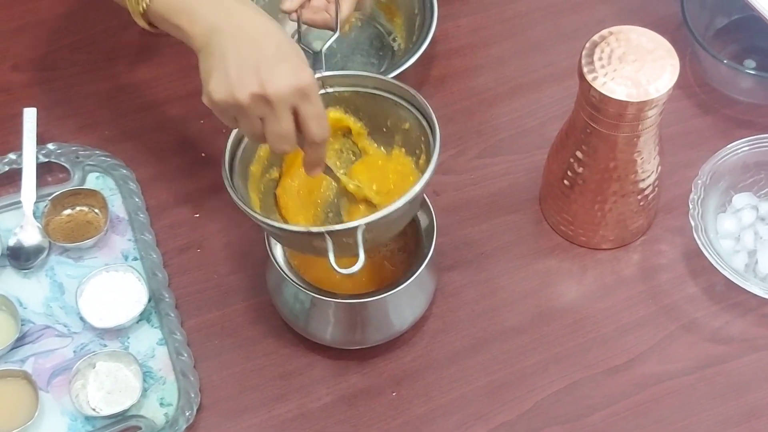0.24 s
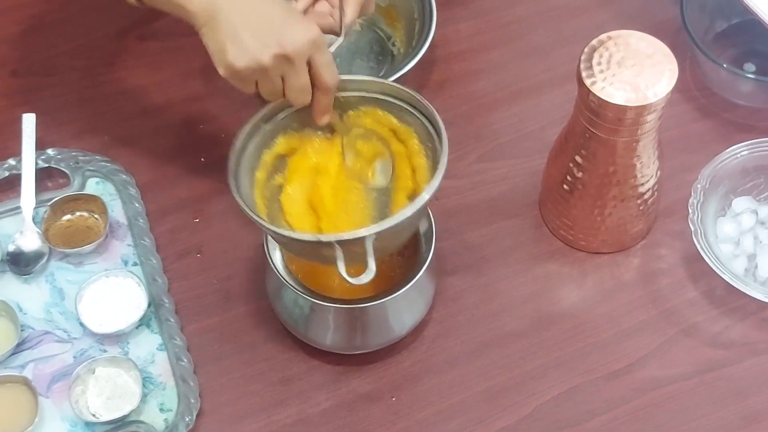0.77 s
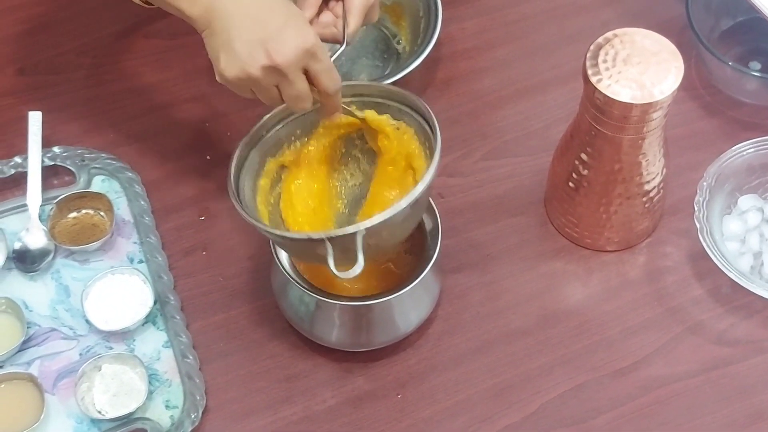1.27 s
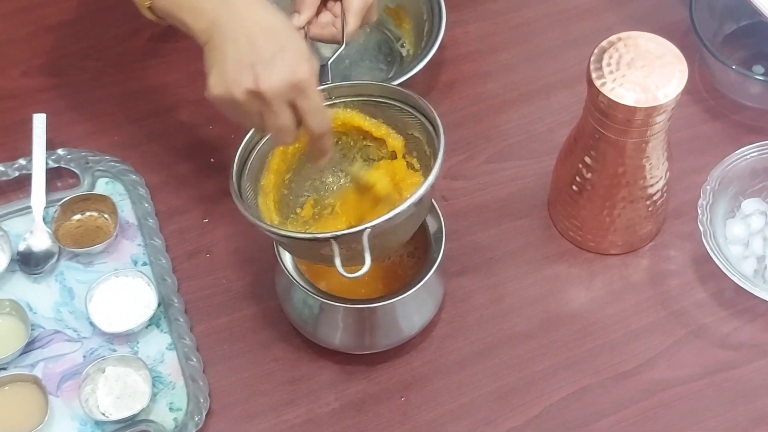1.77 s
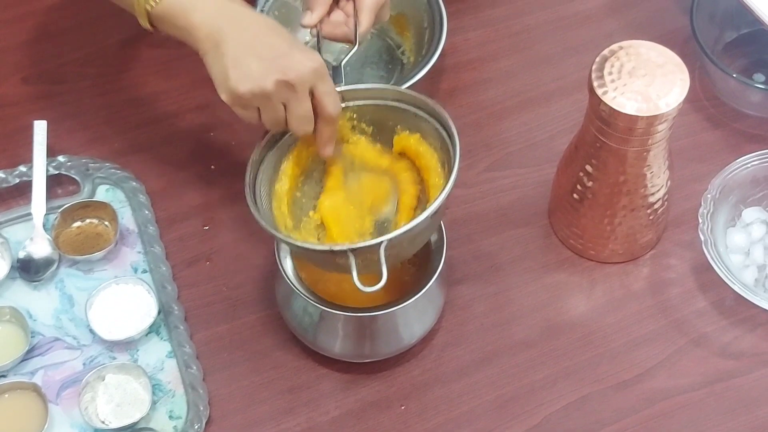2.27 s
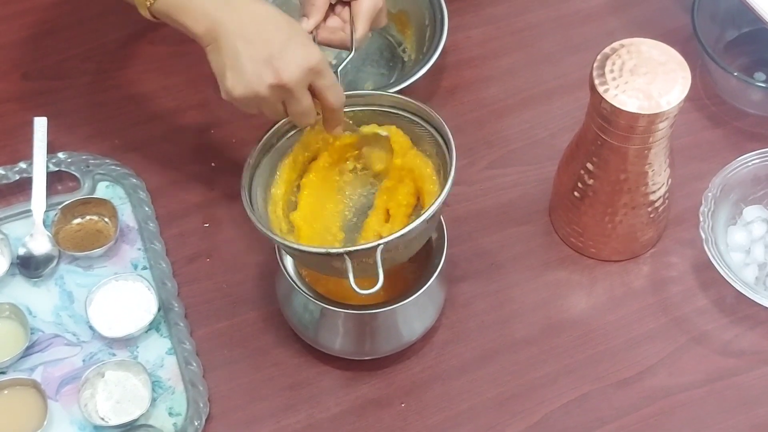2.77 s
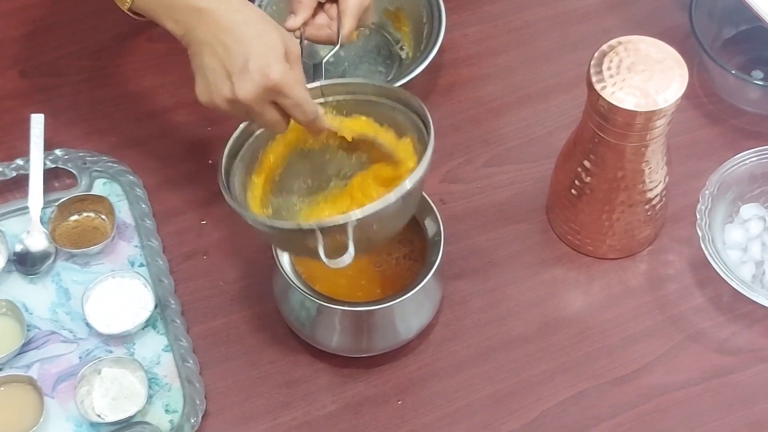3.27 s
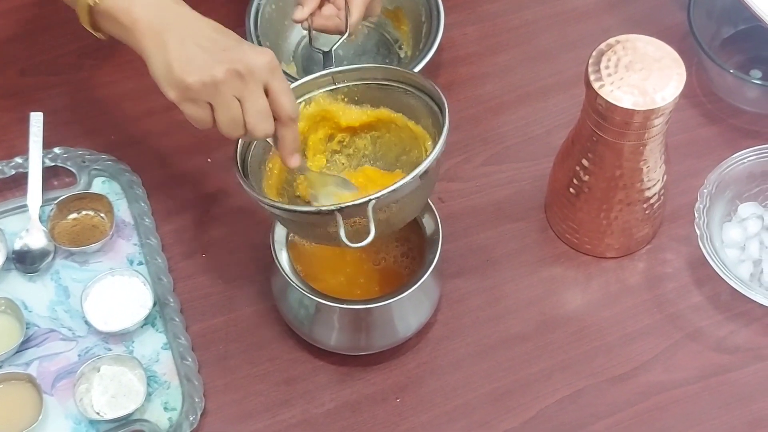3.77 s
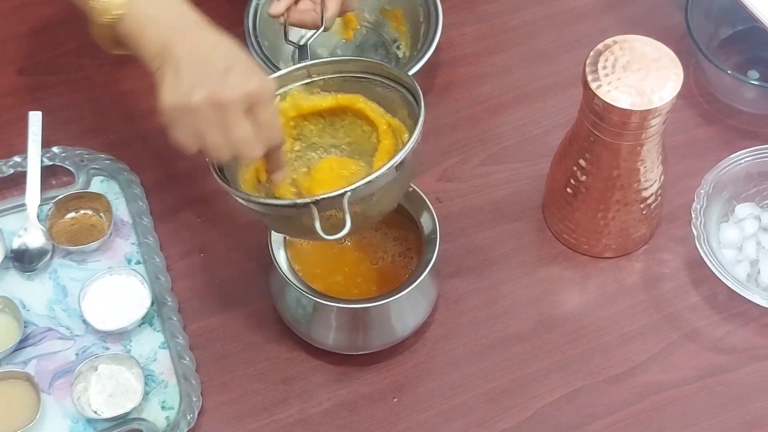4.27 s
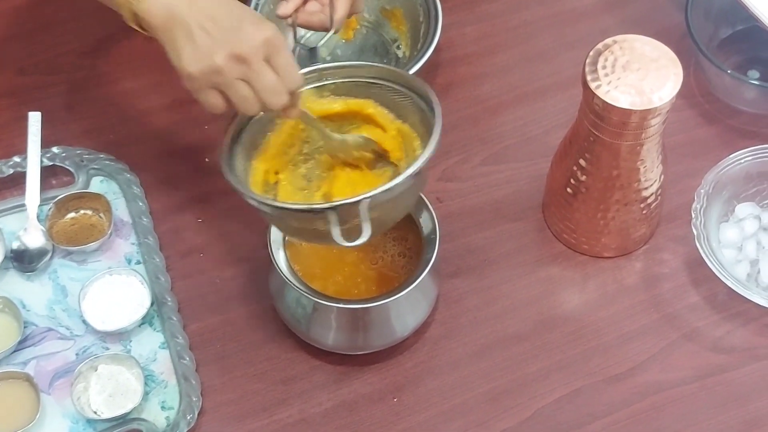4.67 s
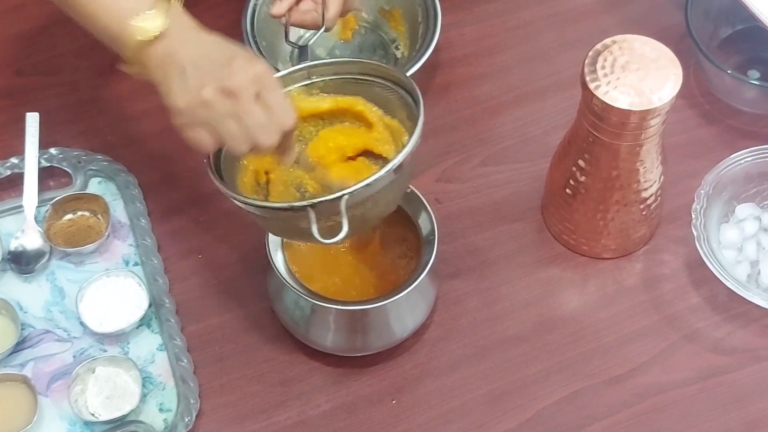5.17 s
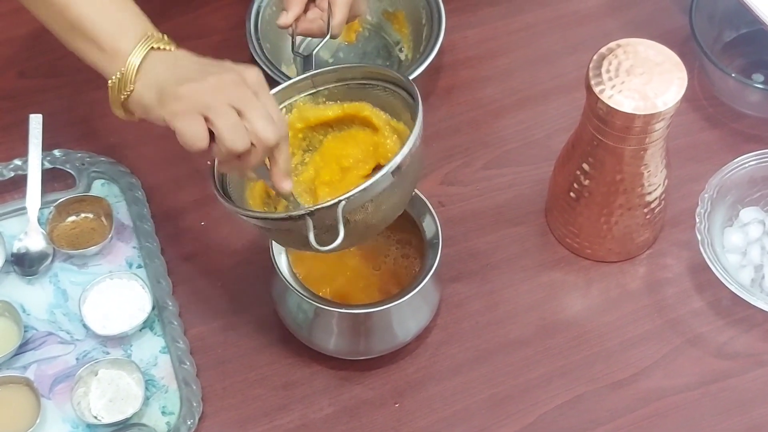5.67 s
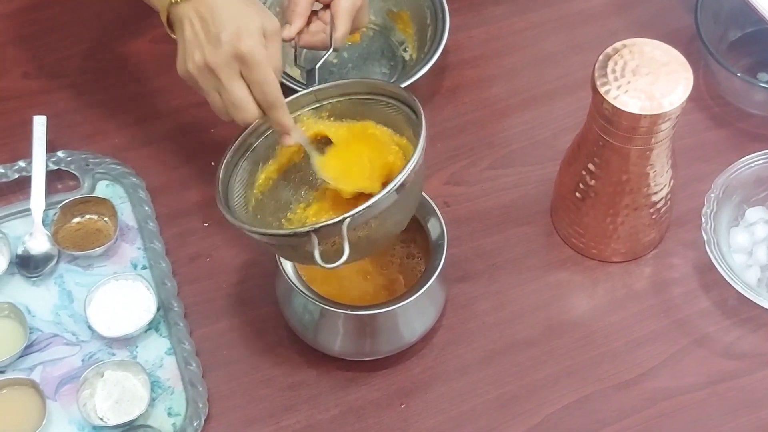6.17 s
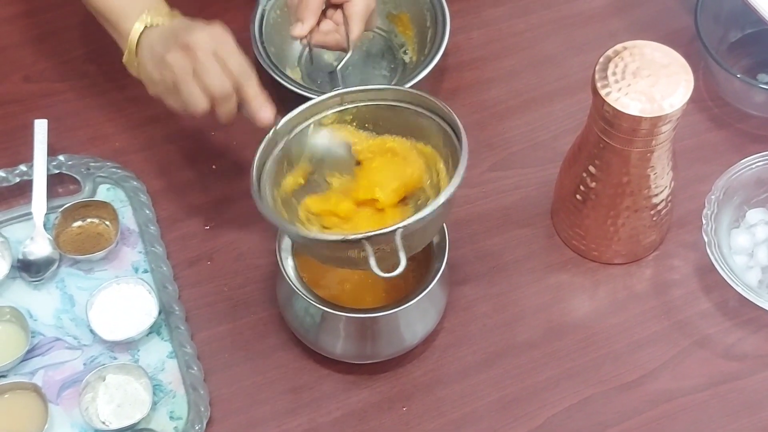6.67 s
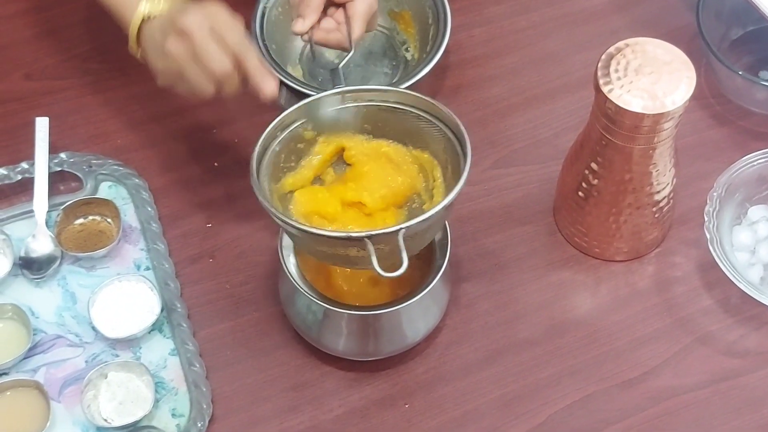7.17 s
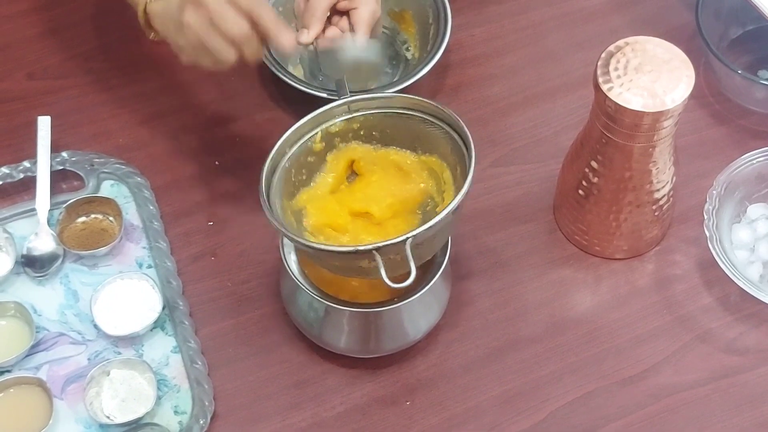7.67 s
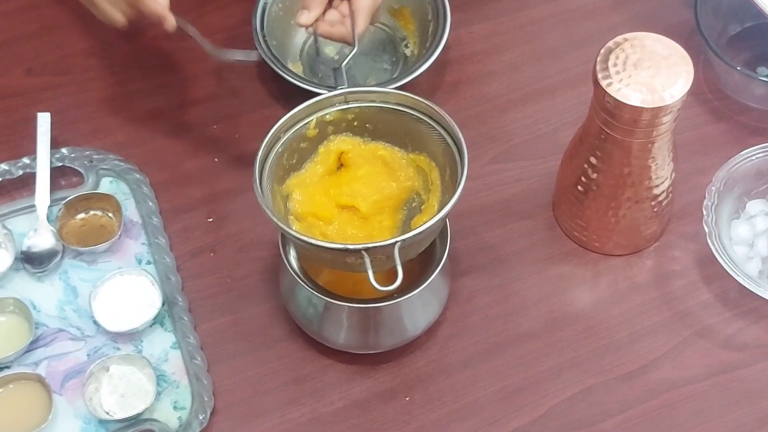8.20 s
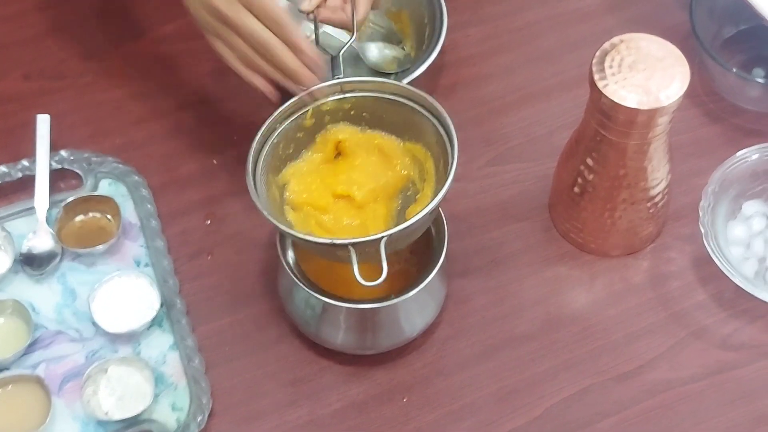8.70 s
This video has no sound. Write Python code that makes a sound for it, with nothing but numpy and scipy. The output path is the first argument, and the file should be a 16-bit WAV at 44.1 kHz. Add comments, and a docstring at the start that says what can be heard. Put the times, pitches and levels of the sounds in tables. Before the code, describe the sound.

Close stereo pickup in a bare, echoing kitchen. A steel spoon rubs thick pulp over a wire-mesh strainer in short gritty strokes, with light taps and brief zippy tones from the wires. The strokes grow faster and louder after four seconds. Then come eight sharp, bright knocks on the rim, about four a second, and after a short pause the spoon drops and bounces in a steel bowl with a clanging ring.

```python
"""A steel spoon rubs fruit pulp through a wire-mesh strainer: uneven contact noise, and a tone where wires pass evenly.
It is set down on the mesh time and again, knocked clean on the strainer's rim eight times, then dropped into
a steel bowl, whose beating modes ring while the table thuds. Impulses through filters and resonators make the hits.
A bare, echoing kitchen answers by convolution, over still air, a far rumble and dull bumps through the floor.
A pair of close microphone ports listens."""
import sys
import numpy as np
from scipy import signal
from scipy.fft import rfft, irfft
from scipy.io import wavfile

SR = 44100
rng = np.random.default_rng(int(sys.argv[2]) if len(sys.argv) > 2 else 0)


def output_pcm(signal):
    """Save a mono or channel-first signal as 16-bit PCM at the path in sys.argv[1].

    Samples are clipped to [-1, 1] before scaling.
    """
    pcm = np.clip(np.atleast_2d(signal).T, -1, 1) * 32767
    wavfile.write(sys.argv[1], SR, np.round(pcm).astype(np.int16))


N = 394254
SIZE = 2 ** 19   # transform length, samples
HZ = np.maximum(np.arange(SIZE // 2 + 1) * SR / SIZE, 1)
LEFT_RIGHT = np.array([[1], [-1]])


def amp(db):
    """Level law: decibels to amplitude ratio."""
    return 10 ** (np.asarray(db) / 20)


def rms_one(x):
    """Normalisation to unit root-mean-square pressure."""
    return x / np.sqrt(np.mean(x ** 2) + 1e-20)


def at_hz(points, hz):
    """Interpolation along logarithmic frequency."""
    point_hz, values = np.transpose(points)
    return np.interp(np.log(hz), np.log(point_hz), values)


def colour(x, points):
    """Minimum-phase filtering: a folded cepstrum gives a causal response of unit power with the given spectrum."""
    cepstrum = irfft(np.log(amp(at_hz(points, HZ[::64]))))
    half = len(cepstrum) // 2
    cepstrum[1:half] *= 2
    cepstrum[half + 1:] = 0
    response = irfft(np.exp(rfft(cepstrum)))
    response /= np.sqrt(np.sum(response ** 2))
    return signal.fftconvolve(x, response)[:len(x)]


def drift(rate_hz):
    """Low-pass random process: noise through a double pole wanders slowly, with unit spread."""
    r = np.exp(-2 * np.pi * rate_hz / SR)
    noise = rng.standard_normal(N + SR)
    return rms_one(signal.lfilter([1], [1, -2 * r, r * r], noise)[SR:])


def resonances(x, modes):
    """Modal superposition: parallel damped resonators, each with its gain given at the peak."""
    out = 0
    for hz, width_hz, db in modes:
        r = np.exp(-np.pi * width_hz / SR)
        feedback = [2, -4 * r * np.cos(2 * np.pi * hz / SR), 2 * r * r]
        out = out + amp(db) * signal.lfilter([1 - r * r, 0, r * r - 1], feedback, x)
    return out


def clicks(times, levels_db):
    """Impulsive excitation: one sample per impact."""
    out = np.full(N, 1e-18)
    out[np.round(np.asarray(times) * SR).astype(int)] = amp(levels_db)
    return out


def blows(times, levels_db, t60):
    """Extended contact: each blow is a noise burst with a 1 ms rise and exponential decay."""
    out, t = np.zeros(N + SR), np.arange(SR // 10) / SR
    envelope = amp(-60 * t / t60) * np.minimum(t / 0.00096, 1)
    for s, db in zip(times, levels_db):
        out[round(s * SR):][:len(t)] += amp(db) * rng.standard_normal(len(t)) * envelope
    return out[:N]


# Likeness of diffuse sound at the two ports. Each row: frequency in Hz, likeness from 0 to 1.
PORT_LIKENESS = [(60, 0.8), (180, 0.99), (550, 0.72), (1650, 0), (4970, 0.04), (15000, 0)]
# Balance of diffuse sound. Each row: frequency in Hz, left over right in dB.
DIFFUSE_BALANCE = [(60, -2.5), (130, 1.5), (290, 1), (640, 2), (1410, 0.5), (3100, 0.5), (6820, -6.5),
                   (15000, 0)]


def to_ports(mid, side):
    """Diffuse-field coherence: the ports share most of the bass and little of the treble; returns spectra."""
    alike = at_hz(PORT_LIKENESS, HZ)
    common = np.sqrt((1 + alike) / 2) * rfft(mid, SIZE)
    opposed = np.sqrt((1 - alike) / 2) * rfft(side, SIZE) * LEFT_RIGHT
    return (common + opposed) * amp(at_hz(DIFFUSE_BALANCE, HZ) / 2 * LEFT_RIGHT)


# Spectrum of the still air. Each row: frequency in Hz, relative level in dB per Hz.
AIR_SPECTRUM = [(18, -59.5), (30, -13.5), (121, 4), (233, 3), (295, 7), (554, -4.5), (822, -16.5),
                (1250, -5), (2120, -9), (2830, -21), (9460, -16.5), (11700, -28), (16000, -48)]
AIR_DB = -57.5
# Course of the far rumble. Each row: time in seconds, level in dB.
RUMBLE_LEVEL = [(0.0, -78), (0.12, -62), (0.66, -80), (0.97, -54.5), (1.11, -77), (1.25, -52), (1.51, -56),
                (1.63, -53), (1.75, -63.5), (3.22, -66), (3.41, -98.5), (5.18, -60), (6.37, -78),
                (7.29, -51), (8.5, -79)]
# Dull bumps through the floor. Each row: start in seconds, level in dB.
FLOOR_BUMPS = [(0.857, -56), (0.968, -60), (1.212, -39.5), (1.538, -51), (1.638, -47)]
# Lowest tones of the room. Each row: frequency in Hz, bandwidth in Hz, gain in dB.
ROOM_MODES = [(84.1, 4.5, 3.5), (120.6, 11, -5), (136, 12, -11), (195, 10, -23.5), (281.3, 3.3, 0),
              (330, 5.9, -35), (353, 14, -24)]


def background():
    """Room-mode excitation: beneath still air, a far rumble and dull bumps wake the room's lowest tones."""
    rumble_s, rumble_db = np.transpose(RUMBLE_LEVEL)
    rumble_level = amp(np.interp(np.arange(N) / SR, rumble_s, rumble_db))
    bump_s, bump_db = np.transpose(FLOOR_BUMPS)
    white = rng.standard_normal((4, N))
    air = np.array([amp(AIR_DB) * colour(w, AIR_SPECTRUM) for w in white[:2]])
    rumble = np.array([rumble_level * rms_one(resonances(w, ROOM_MODES)) for w in white[2:]])
    bumps = amp(28) * resonances(blows(bump_s, bump_db, 0.21), ROOM_MODES[:4])
    mid, side = air + rumble + bumps * [[1], [.3]]
    return irfft(to_ports(mid, side), SIZE)[:, :N]


# Reverberation time. Each row: frequency in Hz, time to fall 60 dB in seconds.
REVERBERATION = [(100, 1.46), (530, 0.78), (1390, 0.75), (3680, 0.66), (9700, 0.51), (16000, 0.51)]
# Tint of the room. Each row: frequency in Hz, gain in dB.
ROOM_TINT = [(100, 3), (300, 1.5), (700, 0.5), (1200, 5), (1700, 4), (2250, 4), (2900, 5.5), (3700, 2),
             (4500, 2.5), (6000, 3), (10500, 1.5), (15000, -4)]
# Echoes of the first walls. Each row: delay in seconds, level in dB.
WALL_ECHOES = [(.0055, -9.5), (0.0182, -12), (.027, -32), (0.036, -15)]
ROOM_ONSET_S, ROOM_DB = 0.018, -2.5


def kitchen():
    """Reverberation: a few wall reflections, and noise that decays exponentially band by band; returns spectra."""
    t = np.arange(int(1.5 * SR)) / SR
    white, tail = rng.standard_normal((2, len(t))), 0
    edges = 60 * 2 ** np.arange(0, 8.5, .5)   # half octaves, Hz
    for low, high in zip(edges, edges[1:]):
        band_filter = signal.butter(2, [low, min(high, .45 * SR)], "band", fs=SR, output="sos")
        decay = amp(-60 * t / at_hz(REVERBERATION, np.sqrt(low * high)))
        tail = tail + decay * signal.sosfilt(band_filter, white)
    tail = tail * np.clip(t / ROOM_ONSET_S, 0, 1) ** 2
    tail = amp(ROOM_DB) * tail / np.sqrt(np.sum(tail[0] ** 2))
    for s, db in WALL_ECHOES:   # a wall smears its echo over a couple of milliseconds
        smear = (t > s) * amp(-60 * np.abs(t - s) / 0.0086) / 6
        tail += amp(db) * rng.standard_normal(tail.shape) * smear
    return to_ports(*tail) * amp(at_hz(ROOM_TINT, HZ))


# Balance of the direct sound. Each row: frequency in Hz, left over right in dB.
DIRECT_BALANCE = [(60, -7), (150, 3), (380, 1.5), (950, 1.5), (2380, 7.5), (5980, -14.5), (15000, 2.5)]
# Scattering by pot and table top, one port a row. Each row: first delay in seconds, second delay in seconds.
SCATTER_DELAYS = [(0.0003214, .00072), (.00024, .00079)]
TRAVEL_S = 0.000494   # from strainer to ports


def direct_path():
    """Propagation and scattering: delay, shading at each port, and nearly all-pass stages that spread the sound."""
    shading = amp(at_hz(DIRECT_BALANCE, HZ) / 2 * LEFT_RIGHT)
    path = shading * np.exp(-2j * np.pi * HZ * TRAVEL_S)
    for lags in np.transpose(SCATTER_DELAYS):
        late = np.exp(-2j * np.pi * HZ * lags[:, None])
        path *= (.65 - late) / (1 - 0.71 * late)
    return path


# Bounces of the spoon in the bowl. Each row: start in seconds, clank level in dB, then against
# the clank: lower modes in dB, upper modes in dB, thud of the table in dB.
BOUNCES = [(8.575, -14.5, -17, -36, -1), (8.592, -24, -17, -22, -18), (8.607, -18, -12, -23, 1),
           (8.627, -11.5, -10, -4, -9), (8.671, -15, -4.5, -6, -18), (8.719, -15, -7.5, -5.5, -14),
           (8.755, -18.5, -8, -4, -13)]
# Modes of the bowl. Each row: frequency in Hz, level in dB, time to fall 60 dB in seconds.
BOWL_MODES = [(1750, -13, .17), (2893, -12, .3), (3661, -11, .35), (4115, -10, .35), (4714, -7, .14),
              (5263, -17, .15), (5417, 2, .16), (5550, -8, .17), (6057, -17, .15), (6250, -10, .13),
              (6514, -14, .1), (7644, -16, .1), (8253, -12, .06), (9808, -15, .06), (11480, -4, .035)]
# Spectrum of spoon on bowl. Each row: frequency in Hz, relative level in dB per Hz.
CLANK_SPECTRUM = [(530, -31), (900, -3), (1390, -5.5), (1750, -2.5), (3770, -6.5), (4920, -4.5),
                  (5410, -7.5), (11800, -2.5), (15100, -12), (16000, -52)]
# Spectrum of the table under the bowl. Each row: frequency in Hz, relative level in dB per Hz.
TABLE_SPECTRUM = [(35, -52), (60, -10), (81, -12), (108, 5.5), (155, -9.5), (340, 6), (483, -1.5),
                  (619, -2), (718, -2.5), (900, -4.5), (1170, -15), (1980, -120)]
# Resonances of the table. Each row: frequency in Hz, bandwidth in Hz, gain in dB.
TABLE_MODES = [(82, 8, 15.5), (114.5, 11, -15), (189, 5.9, 4.5), (290, 7.6, -2), (363, 20, 2), (335, 36, 9)]
SPLIT_HZ, STRIKE_SPREAD_DB, THUD_LAG_S = 11, 3, .003   # largest shift of a twin mode; spread; delay


def bowl():
    """Broken symmetry: a dented bowl's modes come in beating pairs, struck anew at each bounce; the table thuds."""
    s, db, lower_db, upper_db, thud_db = np.transpose(BOUNCES)
    thud = clicks(s + THUD_LAG_S, db + thud_db)
    clank = amp(17) * clicks(s, db) + blows(s, db - 3.5, 0.055)
    table = amp(16.5) * colour(thud, TABLE_SPECTRUM) + amp(21) * resonances(thud, TABLE_MODES)
    out = colour(clank, CLANK_SPECTRUM) + table
    a = round(s[0] * SR)
    for hz, level_db, t60 in BOWL_MODES:
        ring_db = lower_db if hz < 5000 else upper_db
        for twin_hz in hz + SPLIT_HZ * rng.uniform(0.38, 1) * np.array([-1, 1]):
            strike_db = rng.normal(0, STRIKE_SPREAD_DB, len(s))
            struck = clicks(s, db + ring_db + level_db + strike_db) * rng.choice([-1, 1], N)
            r, w = amp(-60 / (t60 * SR)), 2 * np.pi * twin_hz / SR
            feedback = [1, -2 * r * np.cos(w), r * r]
            out[a:] += signal.lfilter([0, np.sin(w) / np.sqrt(2)], feedback, struck[a:])
    return out


# Spectrum of the rim's crack. Each row: frequency in Hz, relative level in dB per Hz.
RIM_SPECTRUM = [(760, -34), (1300, -1.5), (1660, -8.5), (2220, 0.5), (2950, -10.5), (3840, 3), (5720, -1.5),
                (9360, -3.5), (10600, -1), (11400, -1.5), (13000, -4.5), (15200, -9), (16000, -45)]
# Short rings of the rim. Each row: frequency in Hz, bandwidth in Hz, gain in dB.
RIM_MODES = [(2255, 60, -9), (3815, 240, -5), (5050, 146, -13.5), (10640, 490, 1)]
# Spectrum of the frame's low knock. Each row: frequency in Hz, relative level in dB per Hz.
FRAME_SPECTRUM = [(120, -36.5), (200, -11), (420, -0.5), (598, 4.5), (984, -0.5), (1250, -8), (1500, -14.5),
                  (1950, -31), (3300, -120)]
RIM_RINGS_DB, RIM_SPREAD_DB = 3.5, 5.5


def strainer_hits(rows, gain_db):
    """Impact response: a bright crack, rim modes newly weighted at each hit, and a lower knock from the frame."""
    s, db, low_db = np.transpose(rows)
    rings = 0
    for mode in RIM_MODES:
        own_db = RIM_SPREAD_DB * rng.standard_normal(len(s))
        rings = rings + resonances(clicks(s, db + RIM_RINGS_DB + own_db), [mode])
    crack = colour(clicks(s, db), RIM_SPECTRUM)
    knock = amp(2) * colour(clicks(s, db + low_db), FRAME_SPECTRUM)
    return amp(gain_db) * (crack + rings + knock)


# Spoon knocked on the rim. Each row: start in seconds, level in dB, low knock against it in dB.
RIM_KNOCKS = [(6.4238, -11, -10), (6.6738, -8, -8.5), (6.8894, -8, -8), (7.1458, -9.5, -9),
              (7.3692, -9, -10), (7.5945, -7.5, -10), (7.831, -9, -10), (8.0403, -8, -11)]


def rim_knocks():
    """Undulled impact: the knocks on the rim keep their full treble."""
    return strainer_hits(RIM_KNOCKS, 13.7)


# Spoon set down on the mesh. Each row: start in seconds, level in dB, low knock against it in dB.
MESH_TOUCHES = [(0.243, -35, -13), (0.2915, -26, -12), (0.6394, -27.5, -1.5), (0.668, -31, -14),
                (0.701, -32, -3), (1.0516, -25, -8), (1.4149, -27, -3.5), (1.5917, -21.5, -31),
                (1.7229, -35.5, -2), (1.8587, -34.5, 2), (2.2074, -29, 1), (2.227, -52, -4),
                (2.5644, -55, -8), (2.586, -27.5, -4), (2.6466, -33, -11), (2.9775, -26, -2),
                (3.4321, -36, -2), (3.446, -48, 7), (4.2477, -23.5, -27), (5.7247, -37, -1),
                (7.115, -25, -24)]
PULP_CUT_HZ = 8300


def mesh_touches():
    """Dulled impact: pulp between spoon and mesh acts as a low-pass filter."""
    pulp = signal.butter(2, PULP_CUT_HZ, fs=SR, output="sos")
    return signal.sosfilt(pulp, strainer_hits(MESH_TOUCHES, 9.6))


# Stretches where the edge crosses the wires evenly. Each row: start in seconds, length in seconds, wire rate
# at the start in Hz, midway in Hz, at the end in Hz, tone level in dB, octave level in dB.
SINGING_STRETCHES = [(0.027, 0.059, 770, 763, 758, -37.5, -46), (0.364, 0.059, 696, 929, 946, -40, -42),
                     (1.154, 0.065, 1050, 990, 850, -36, -55), (1.894, 0.085, 730, 766, 957, -48, -61),
                     (2.265, 0.058, 888, 920, 870, -43, -65), (2.745, 0.05, 861, 700, 667, -37.5, -42),
                     (3.062, .04, 936, 820, 841, -37, -60), (3.13, 0.029, 854, 907, 799, -39, -62),
                     (3.523, 0.078, 882, 700, 793, -41, -55), (3.934, 0.09, 1060, 1130, 1194, -42.5, -56),
                     (4.02, 0.037, 760, 720, 656, -41.5, -41), (4.375, 0.03, 500, 501, 520, -38, -56),
                     (4.503, 0.11, 462.3, 418, 320, -61, -41), (4.68, .11, 720, 477, 295, -40, -52),
                     (4.699, .04, 892, 1025, 1050, -34, -57), (4.82, 0.0593, 915, 820, 764, -40, -65),
                     (4.79, 0.074, 299, 510, 530, -37.5, -48), (4.95, .05, 840, 689, 630, -35, -55),
                     (5.0, .07, 520, 385, 285, -39, -49), (5.085, .06, 284, 420, 640, -36.5, -48),
                     (5.14, .05, 643, 647, 660, -38, -55), (5.25, 0.047, 793, 780, 774, -42.5, -73),
                     (5.297, .055, 490, 396, 320, -42, -52), (5.362, 0.058, 415, 533, 493, -38, -38.5),
                     (5.83, 0.057, 642, 575, 547, -34, -68)]
SONG_SWELL_DB = 4.5   # a stretch is this much fainter at its ends than midway
SONG_WAVER, SONG_FLICKER_DB = .015, 2   # spread of the rate as a fraction; spread of the level


def wire_song():
    """Periodic excitation: the wire rate sets a gliding, wavering tone and its octave, which swell and fade."""
    out, waver = np.zeros(N), 1 + SONG_WAVER * drift(35)
    for s, length, start_hz, mid_hz, end_hz, tone_db, octave_db in SINGING_STRETCHES:
        a, b = round(s * SR), round((s + length) * SR)
        way = np.linspace(0, 1, b - a)
        rate_hz = np.interp(way, [0, .5, 1], [start_hz, mid_hz, end_hz]) * waver[a:b]
        phase = 2 * np.pi * np.cumsum(rate_hz) / SR
        fade = np.clip(np.minimum(way, 1 - way) * length / 0.0034, 0, 1)
        swell = amp(-SONG_SWELL_DB * (2 * way - 1) ** 2)
        tone = amp(tone_db) * np.sin(phase) + amp(octave_db) * np.sin(2 * phase)
        out[a:b] += fade * swell * tone
    return out * amp(SONG_FLICKER_DB * drift(60))


# Strokes of the spoon over the mesh. Each row: start in seconds, rise in seconds, length in seconds, scrape level
# once risen in dB, at the end in dB, then against the scrape: strainer body in dB, air under the spoon in dB;
# pitch of that air at the start in Hz, at the end in Hz.
SPOON_STROKES = [(0.0, 0.00067, 0.056, -35, -41, -7.5, -7, 2176, 2050),
                 (0.291, 0.0059, 0.051, -40, -46, -5.5, -6, 2070, 2050),
                 (.35, 0.013, .052, -33.5, -36, -5.5, -14, 2000, 1860),
                 (0.723, .007, 0.057, -32, -36.5, -6.5, -12, 2000, 1870),
                 (1.055, 0.027, 0.13, -39.5, -33, -8, -8, 2065, 1746),
                 (1.45, 0.046, 0.1, -38, -45.5, -4.5, -8, 2023, 2184),
                 (1.866, 0.03, 0.084, -36, -29, -9, -16, 2000, 2010),
                 (2.26, 0.011, 0.088, -44, -43, -7, -5.5, 2180, 2050),
                 (2.642, 0.004, 0.12, -39, -36.5, -6.5, -5.5, 2180, 1750),
                 (3.001, 0.028, 0.064, -49, -44, -10, 0, 2080, 2150),
                 (3.056, 0.011, 0.09, -47.5, -33, -6, -20, 2197, 2080),
                 (3.46, 0.027, 0.092, -44, -32, -4, -13, 1908, 2044),
                 (3.908, 0.029, 0.11, -39.5, -36, -7, -9.5, 1906, 1627),
                 (4.237, 0.029, 0.069, -35.5, -50, -5.5, -5.5, 2006, 1888),
                 (4.355, 0.021, 0.053, -30, -26, -11, -2.5, 2103, 1932),
                 (4.46, 0.022, .13, -36, -33, -8, -6, 1934, 2220),
                 (4.666, 0.01, 0.076, -26, -42, -8.5, -14, 2070, 2100),
                 (4.79, 0.032, .09, -35.5, -39, -5, -10, 2129, 2090),
                 (4.945, 0.0067, 0.082, -27, -36, -8.5, -26, 1976, 2000),
                 (5.08, 0.025, 0.078, -36.5, -34, -6, -11, 2000, 2073),
                 (5.23, 0.028, .092, -27.5, -39.5, -11, -7, 2097, 2106),
                 (5.35, 0.033, 0.1, -36, -40.5, -8, -9.5, 2125, 2120),
                 (5.509, .01, 0.042, -26, -30.5, -11, -7, 2118, 2108),
                 (5.805, .03, .11, -35, -32.5, -10, -21, 2106, 2160),
                 (5.92, 0.02, 0.047, -32, -28, -8, -1.5, 2215, 2180),
                 (6.0, 0.0068, 0.07, -33, -28, -8, -6.5, 2150, 2070)]
RISE_DB, RELEASE_DB_PER_S = 9, 1200   # climb of a stroke; its fall when the spoon lifts
LANDING_S = 0.0049   # the edge settles on the mesh


def strokes():
    """Pressure envelope: level rises, runs to its last value and falls; colour glides from stroke to stroke."""
    t, level = np.arange(N) / SR, np.zeros(N)
    fall = 60 / RELEASE_DB_PER_S
    for s, rise, length, first_db, last_db, *_ in SPOON_STROKES:
        a, b = round(s * SR), round((s + length + fall) * SR)
        since = t[a:b] - s
        corners_s = [0, min(rise, length - .002), length, length + fall]
        corners_db = [first_db - RISE_DB, first_db, last_db, last_db - 60]
        landing = np.minimum(since / LANDING_S + (s == 0), 1)   # a stroke at time zero has already landed
        level[a:b] += landing * amp(np.interp(since, corners_s, corners_db))
    # between strokes, colour glides from the end of one to the start of the next
    s, _, length, _, _, body_db, hollow_db, start_hz, end_hz = np.transpose(SPOON_STROKES)
    ends = np.ravel([s, np.minimum(s + length, np.append(s[1:], N))], order="F")
    hollow_hz = np.interp(t, ends, np.ravel([start_hz, end_hz], order="F"))
    body_db, hollow_db = [np.interp(t, ends, np.repeat(db, 2)) for db in (body_db, hollow_db)]
    return level, body_db, hollow_db, hollow_hz


# Spectrum of the mesh. Each row: frequency in Hz, relative level in dB per Hz.
MESH_SPECTRUM = [(650, -43.5), (1100, -10), (1630, -6.5), (1800, -7.5), (1950, -7), (2130, -3),
                 (2920, -7.5), (4830, -9), (8740, -13.5), (11800, -8.5), (16000, -25.5)]
# Rings of the mesh. Each row: frequency in Hz, bandwidth in Hz, gain in dB.
MESH_MODES = [(1920, 60, -17), (2000, 44, -7), (3070, 130, -28), (3780, 103, 5), (4800, 80, -36),
              (5460, 120, -4)]
# Spectrum of the strainer body. Each row: frequency in Hz, relative level in dB per Hz.
BODY_SPECTRUM = [(120, -41.5), (200, -22.5), (371, -9.5), (466, -10.5), (769, -5), (914, -7), (1000, -3),
                 (1300, -36), (1690, -59), (2860, -120)]
CONTACTS_PER_S = 6000


def scrape():
    """Random impact excitation: uneven wire contacts, in clumps, sound mesh, strainer body and air under the spoon."""
    level, body_db, hollow_db, hollow_hz = strokes()
    sizes = amp(2.7 * np.minimum(rng.exponential(1, (4, N)), 5)) * rng.choice([-1, 1], (4, N))
    clumps = amp(2.6 * drift(74) + 1.1 * drift(11))
    slips = sizes * (rng.random((4, N)) < CONTACTS_PER_S / SR) * clumps
    bright = colour(slips[0], MESH_SPECTRUM) + resonances(slips[0], MESH_MODES)
    body = colour(slips[1], BODY_SPECTRUM)
    # low-passed complex noise, shifted up to the gliding pitch of the air
    low_pass = signal.butter(2, 160, fs=SR, output="sos")
    swell = signal.sosfilt(low_pass, slips[2] + 1j * slips[3])
    hollow = np.real(swell * np.exp(2j * np.pi * np.cumsum(hollow_hz) / SR))
    return level * (rms_one(bright) + amp(hollow_db) * rms_one(hollow) + amp(body_db) * rms_one(body))


PLACES, SONG_ROOM_DB = 3, -11   # spoon positions; wire song's share in the room


def scene():
    """Superposition: direct sound, the room's answer from each place of the wandering spoon, and background."""
    near = amp(-1.5) * scrape() + mesh_touches() + rim_knocks() + bowl()
    song = wire_song()
    heard = rfft(near + song, SIZE) * direct_path()
    into_room = near + amp(SONG_ROOM_DB) * song
    shares = np.array([drift(3.36) for _ in range(PLACES)])
    for share in shares / np.linalg.norm(shares, axis=0):
        heard += rfft(share * into_room, SIZE) * kitchen()
    return irfft(heard, SIZE)[:, :N] + background()


def record(dry):
    """Clipping and band limiting: peaks stop at full scale, then a steep low-pass cuts the top."""
    top_cut = signal.cheby2(18, 95, 16850, fs=SR, output="sos")
    return signal.sosfilt(top_cut, np.clip(dry, -1, 1))


dry = scene()
out = record(dry)
output_pcm(out)
```